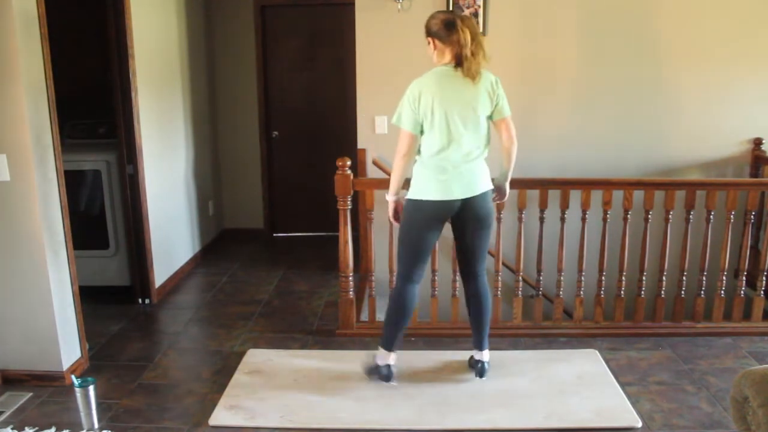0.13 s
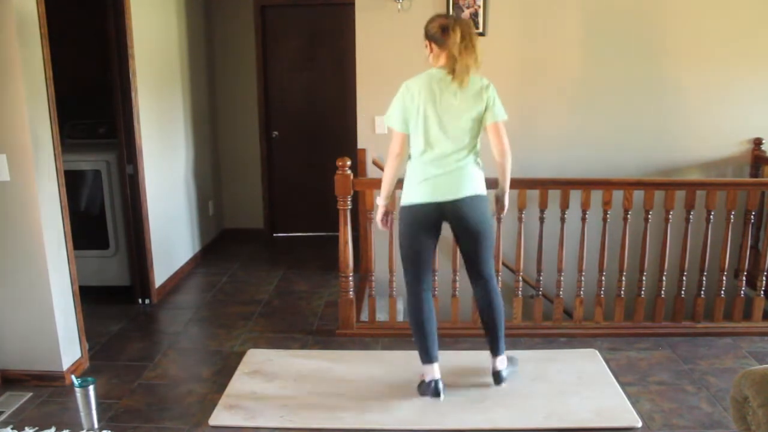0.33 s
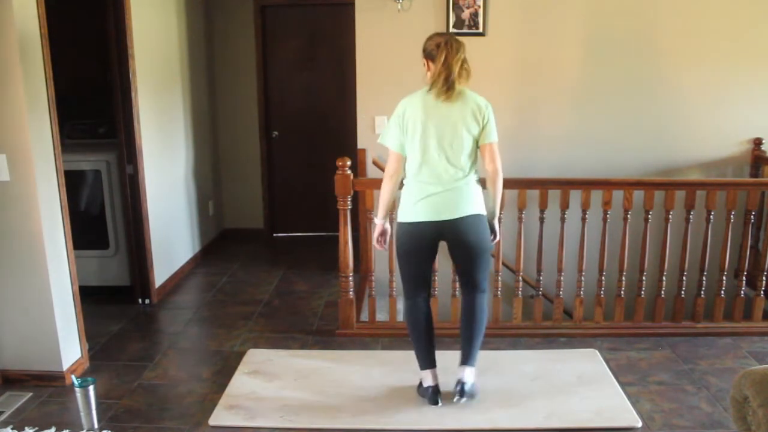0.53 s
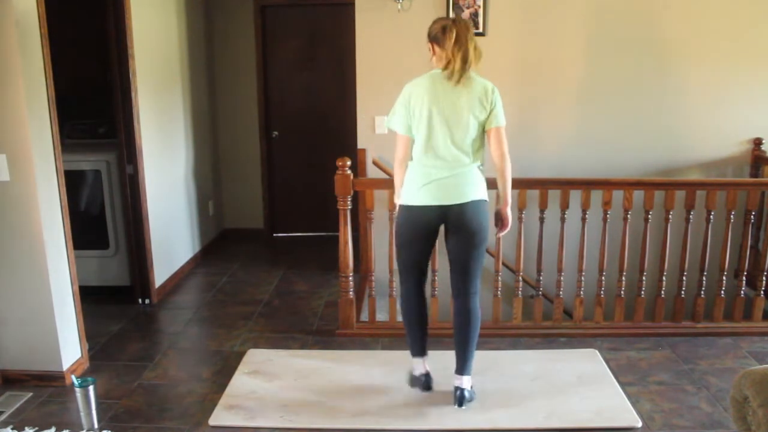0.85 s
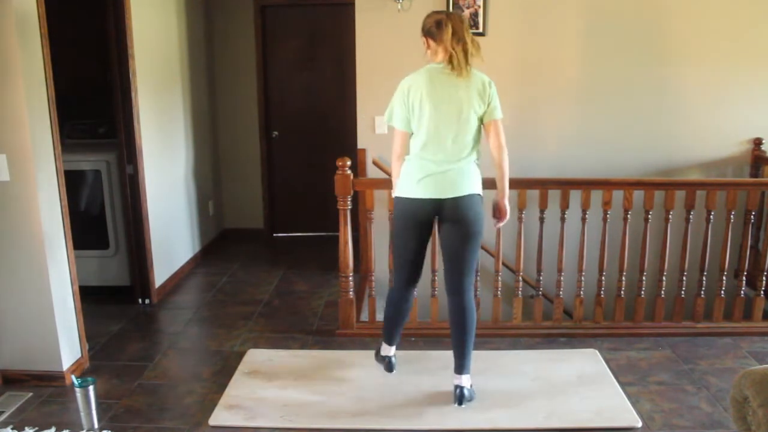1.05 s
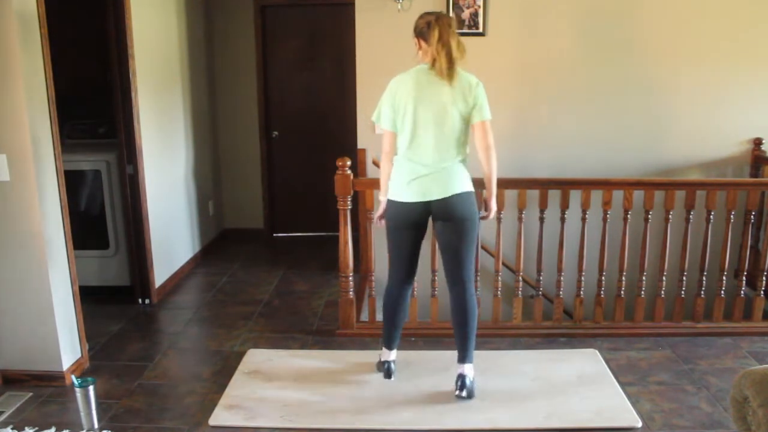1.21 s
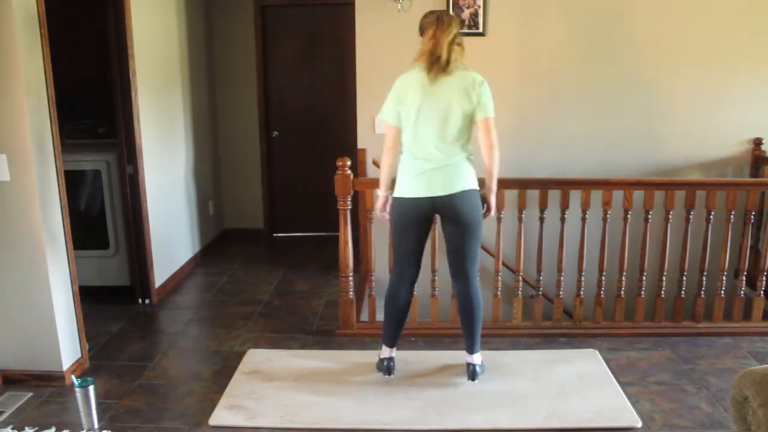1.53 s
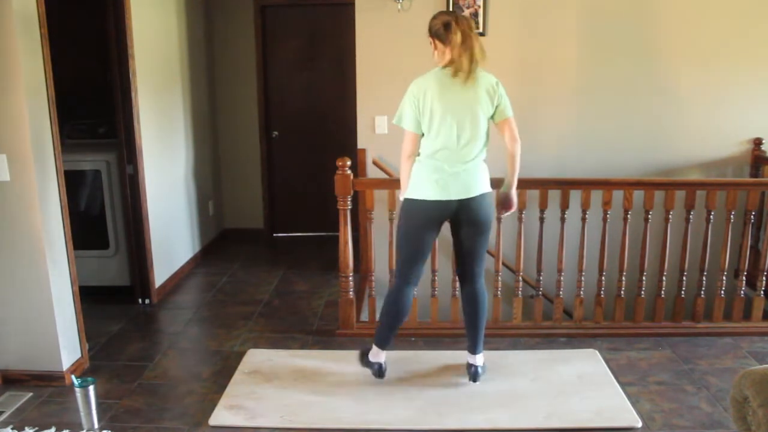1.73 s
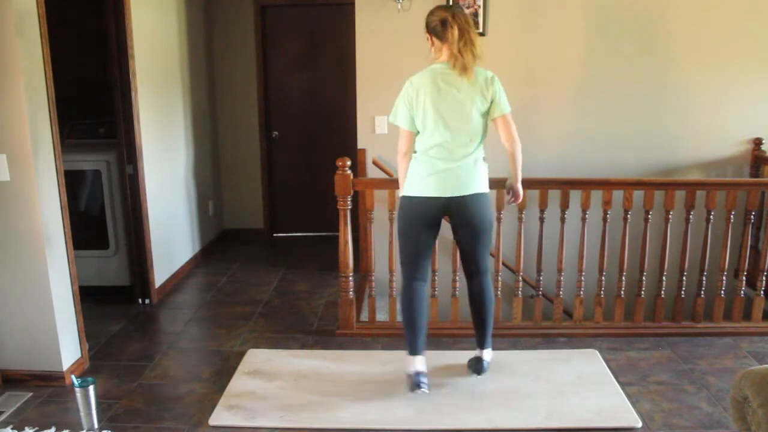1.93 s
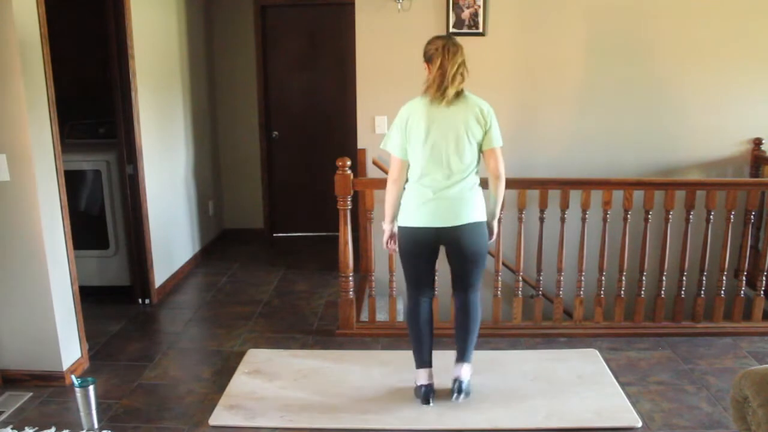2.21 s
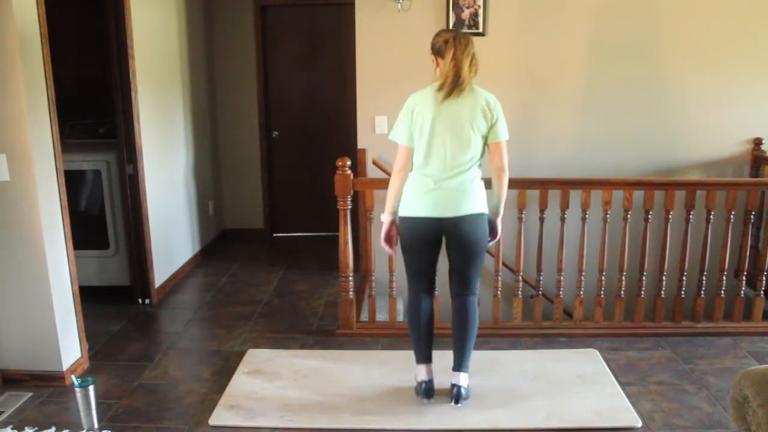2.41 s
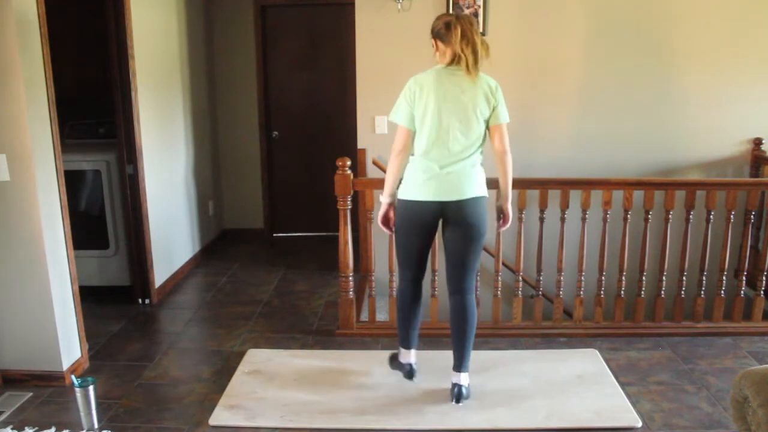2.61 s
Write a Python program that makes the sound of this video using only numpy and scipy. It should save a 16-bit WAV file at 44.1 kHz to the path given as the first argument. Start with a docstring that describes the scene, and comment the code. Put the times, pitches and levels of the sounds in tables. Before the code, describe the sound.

Tap shoes click on a wooden practice board: four quick taps, two spaced ones, then four more quick taps. Soft thuds of landing weight fall between them, picked up by a nearby microphone in a live, hard-floored room.

```python
"""A live, hard-floored room, one microphone within earshot of a dancer on a wooden practice board.
Each step of the metal-tipped tap shoes rings a plate and knocks the board. Between taps the weight
lands in soft thuds and a lifted plate ticks faintly, over low room noise. The recorder's gain
control holds the loud start of each echo level; a crack that slips past it overloads the recorder."""
import sys
import numpy as np
from scipy import signal
from scipy.fft import rfft, irfft
from scipy.io import wavfile

SR = 44100
rng = np.random.default_rng(int(sys.argv[2]) if len(sys.argv) > 2 else 0)


def wrap_up_sound(samples):
    """Save the sound to the file named by the first command line argument, as 16-bit audio."""
    columns = np.atleast_2d(samples).T
    # keep every value between -1 and 1, then stretch to whole-number steps
    tamed = np.clip(columns, -1, 1)
    steps = np.round(tamed * 32767).astype(np.int16)
    wavfile.write(sys.argv[1], SR, steps)


N = 121275
LEAD = int(0.4 * SR)   # samples ahead of time zero: the first tap is only heard dying away
TOTAL, RING, TAIL = LEAD + N, SR // 8, SR   # samples in the scene, a resonance, the room's echo

# A plate strikes the board. Each row: start in seconds, level in dB, knock in dB, bending in dB,
# lower plate mode in Hz, its width in Hz, upper plate mode in Hz, its gain in dB, treble in dB,
# treble cut-off in Hz, diffuse echo in dB, wall reflection in dB (capped in room_response).
TAP_STRIKES = [(-0.26, 15.5, 6.5, -7, 1710, 950, 3320, 6, 15, 9200, 3, -20),
               (0.2151, 23.5, -3, -18.5, 1915, 496, 2670, -1.5, 2, 10800, 3.5, -16),
               (0.3440, 19, 1, -11, 1770, 440, 3410, 0, 7, 12600, -1, -15),
               (0.4489, 22, -10.5, -17, 1640, 530, 3300, -6, -7, 10900, -2, -7),
               (0.6070, 22, -10.5, -18.5, 1790, 484, 3240, 1.5, -2.5, 8200, -2.5, -24),
               (1.1663, 24, 1.5, -14.5, 2230, 420, 2920, -2.5, 3, 11600, 2, -22),
               (1.5204, 16, 3, -10.5, 1670, 680, 3500, 5, 11, 11000, -0.5, -6.5),
               (1.8737, 25.5, -8.5, -24.5, 1775, 443, 3050, 2.5, -2, 11100, 1, -8),
               (2.0219, 20.5, -3, -15, 1930, 365, 3500, -4, 4, 12800, 2, -29),
               (2.1262, 17, -12.5, -19, 1540, 580, 3200, 0, -5, 11000, 0, -24),
               (2.2773, 19.5, -15, -15.5, 1780, 520, 3250, 3, -4.5, 7960, 0, -7)]
# The plate's high modes. Each row: frequency in Hz, width in Hz, gain in dB.
PLATE_TREBLE_MODES = [(4100, 270, -31), (5080, 1300, -20.5), (6680, 220, -12.5), (8510, 1040, -22),
                      (11020, 470, -29.5), (14000, 5400, -29)]
# The board's knock. Each row: frequency in Hz, width in Hz, gain in dB.
BOARD_KNOCK_MODES = [(364, 62, -8.5), (472, 95, -5), (658, 103, -1), (804, 300, -2), (900, 350, -4)]
# The board's slow bending. Each row: frequency in Hz, width in Hz, gain in dB.
BOARD_BENDING_MODES = [(80, 12, 0), (116, 20, 0), (185.5, 26.5, 1), (288, 34.5, 5)]
# Weight lands on the board. Each row: start in seconds, level in dB, contact cut-off in Hz.
WEIGHT_LANDINGS = [(0.37, 15, 426), (0.403, 14, 200), (0.438, 15, 87), (2.044, 11, 446), (2.083, 7, 300),
                   (2.112, 21.5, 107)]
# A lifted shoe's plate ticks. Each row: start in seconds, level in dB.
PLATE_TICKS = [(0.042, -22), (0.863, -32), (0.917, -31), (1.728, -25), (2.478, -27), (2.528, -52)]
# Reflections off nearby surfaces. Each row: delay in seconds, gain in dB.
NEAR_REFLECTIONS = [(0.0054, -5.5), (0.012, -12.5)]
# The room's diffuse echo. Each row: frequency in Hz, relative level in dB, seconds to fall 60 dB.
ECHO_BANDS = [(71.4, -4.5, 0.62), (200, -1.5, 0.51), (483, 3.5, 0.58), (1290, 1.5, .68), (2440, -2, 0.59),
              (4770, -3.5, 0.64), (8330, 1.5, 0.44), (13900, 8.5, 0.31)]
# Steady room noise. Each row: frequency in Hz, relative spectral density in dB.
ROOM_NOISE_SPECTRUM = [(30, -3), (90, -12), (175, 5.5), (250, 0), (360, 6.5), (600, -8.5), (1500, -10),
                       (4000, -12), (8000, -22.5), (15000, -25.5)]


def taps():
    """The plate, damped by the board, rings briefly as the foot lands; the board knocks and bends."""
    contact_hz, upper_width_ratio = 4400, 2.37   # the foot damps both plate modes together
    treble, bending = struck_body(PLATE_TREBLE_MODES), struck_body(BOARD_BENDING_MODES)
    knock = soften(struck_body(BOARD_KNOCK_MODES), contact_hz)
    out = np.zeros(TOTAL)
    for (start, level_db, knock_db, bend_db, lower_hz, lower_width, upper_hz, upper_db,
         treble_db, treble_hz, echo_db, wall_db) in TAP_STRIKES:
        lower = ring(lower_hz, lower_width)
        upper = from_db(upper_db) * ring(upper_hz, upper_width_ratio * lower_width)
        clack = soften(lower + upper, contact_hz) + from_db(treble_db) * soften(treble, treble_hz)
        board = from_db(knock_db) * knock + from_db(bend_db) * bending
        at_microphone = in_room(clack, echo_db, wall_db) + in_room(board, echo_db, wall_db)
        add(out, start, from_db(level_db) * at_microphone)
    return out


def thuds():
    """The sole comes down softly under the dancer's weight and bends the board."""
    out, bending = np.zeros(TOTAL), struck_body(BOARD_BENDING_MODES)
    for start, level_db, contact_hz in WEIGHT_LANDINGS:
        add(out, start, from_db(level_db) * in_room(soften(bending, contact_hz), echo_db=-11))
    return out


def ticks():
    """A lifted shoe's plate gives tiny bright clicks between the steps."""
    out, tick = np.zeros(TOTAL), ring(hz=12400, width_hz=4500)
    for start, level_db in PLATE_TICKS:
        add(out, start, from_db(level_db) * in_room(tick, echo_db=-11))
    return out


def ring(hz, width_hz):
    """One resonance struck by a click: unit gain at its peak, and the wider, the sooner it dies."""
    radius = np.exp(-np.pi * width_hz / SR)
    feedforward = np.array([1, 0, -1]) * (1 - radius ** 2) / 2
    feedback = [1, -2 * radius * np.cos(2 * np.pi * hz / SR), radius ** 2]
    return signal.lfilter(feedforward, feedback, signal.unit_impulse(RING)) + 1e-18


def struck_body(modes):
    """A struck body rings in all its modes at once, signs alternating."""
    return sum((-1) ** k * from_db(db) * ring(hz, width) for k, (hz, width, db) in enumerate(modes))


def in_room(sound, echo_db, wall_db=-20):
    """A sound on the board as it reaches the microphone through the room."""
    return signal.fftconvolve(sound, room_response(echo_db, wall_db))


def room_response(echo_db, wall_db):
    """Direct sound, duller reflections that shift with the spot on the board, then the diffuse echo."""
    wall_delay_s, loudest_wall_db, spread_s = 0.0331, -9, 0.00018
    direct = from_db(-4) * signal.unit_impulse(TAIL)
    echo = diffuse_echo(echo_db)
    early = np.full(TAIL, 1e-18)
    for delay_s, db in [*NEAR_REFLECTIONS, (wall_delay_s, min(wall_db, loudest_wall_db))]:
        arrival_s = abs(delay_s + spread_s * rng.standard_normal())
        early[int(arrival_s * SR)] += from_db(db)
    return direct + soften(early, cutoff_hz=10600) + echo


def diffuse_echo(echo_db):
    """Dense reflections blur into noise that builds quickly, each band dying at its own rate."""
    base_db, build_s = -29, 0.003
    t, hz = np.arange(TAIL) / SR, np.fft.rfftfreq(TAIL, 1 / SR)
    spectrum = rfft(rng.standard_normal(TAIL)) * from_db(base_db + echo_db + at_hz(ECHO_BANDS, hz))
    centres_hz = np.geomspace(60, 16000, 12)
    echo = np.zeros(TAIL)
    for centre_hz, weights in zip(centres_hz, np.eye(len(centres_hz))):
        triangle = at_hz(np.c_[centres_hz, weights], hz)   # neighbouring bands cross-fade
        t60_s = at_hz(ECHO_BANDS, centre_hz, column=2)
        echo += irfft(spectrum * triangle, TAIL) * from_db(-60 * t / t60_s)
    return echo * (1 - np.exp(-t / build_s))


def room_noise():
    """The room's low, steady hush behind the footwork."""
    hz = np.fft.rfftfreq(TOTAL, 1 / SR)
    gain = from_db(-50.5 + at_hz(ROOM_NOISE_SPECTRUM, hz))
    return irfft(rfft(rng.standard_normal(TOTAL)) * gain, TOTAL)


def from_db(db):
    """Decibels to gain."""
    return 10 ** (np.asarray(db) / 20)


def at_hz(rows, hz, column=1):
    """Read one column of a table on a log-frequency axis."""
    rows = np.array(rows)
    return np.interp(np.log(hz + 1e-9), np.log(rows[:, 0]), rows[:, column])


def add(out, start_s, sound):
    """Mix a sound in, start_s after time zero."""
    start = max(LEAD + int(start_s * SR), 0)
    out[start:start + len(sound)] += sound[:TOTAL - start]


def soften(sound, cutoff_hz):
    """Two-pole low-pass: dulls a sound as a yielding contact does."""
    return signal.sosfilt(signal.butter(2, cutoff_hz, fs=SR, output="sos"), sound)


def smooth(values, seconds):
    """One-pole follower with the given time constant."""
    pole = np.exp(-1 / (seconds * SR))
    return signal.lfilter([1 - pole], [1, -pole], values)


def gain_control(sound):
    """The recorder pulls loud sound down to nearly one level, reacting a moment late."""
    hold_db, squeeze, release_db_per_s = -27, 0.97, 248
    sense_s, attack_s, reaction_s = 0.0039, 0.006, 0.0008
    t = np.arange(N) / SR
    level_db = 10 * np.log10(smooth(sound ** 2, sense_s) + 1e-12)
    wanted_cut_db = squeeze * np.maximum(level_db - hold_db, 0)
    ramp_db = release_db_per_s * t
    held_cut_db = np.maximum.accumulate(wanted_cut_db + ramp_db) - ramp_db   # peaks let go steadily
    cut_db = smooth(held_cut_db, attack_s)
    return sound * from_db(-np.interp(t - reaction_s, t, cut_db))


def scene():
    """Footwork and room noise at the microphone, in mono."""
    return (taps() + thuds() + ticks() + room_noise())[None, LEAD:]


def record(dry):
    """The microphone dulls the treble; peaks that pass the gain control clip; the very top is cut."""
    ceiling, top_hz = 0.17, 15700
    microphone = soften(dry[0], cutoff_hz=10800)
    drive = gain_control(microphone) / ceiling
    clipped = ceiling * drive / (1 + drive ** 8) ** (1 / 8)
    steep_lowpass = signal.ellip(10, 0.1, 80, top_hz, fs=SR, output="sos")
    return signal.sosfilt(steep_lowpass, clipped[None])


dry = scene()
out = record(dry)
wrap_up_sound(out)
```